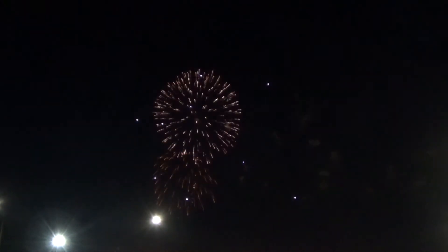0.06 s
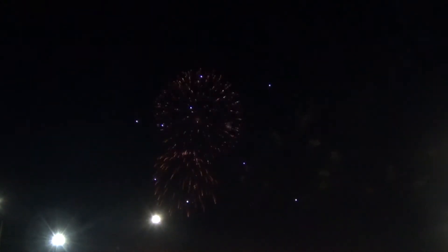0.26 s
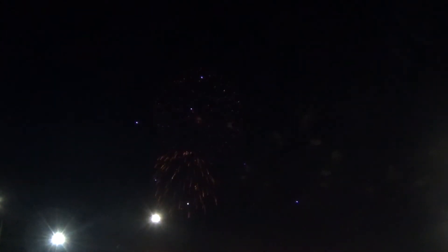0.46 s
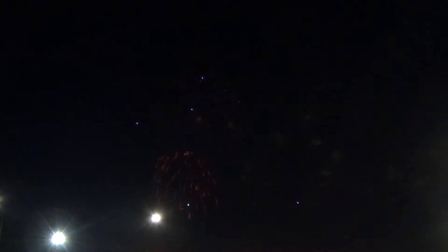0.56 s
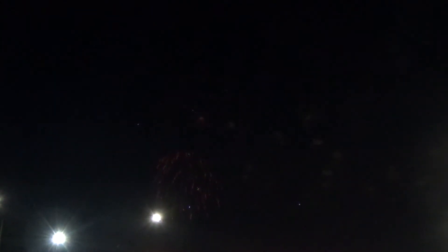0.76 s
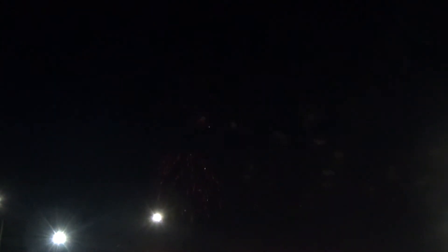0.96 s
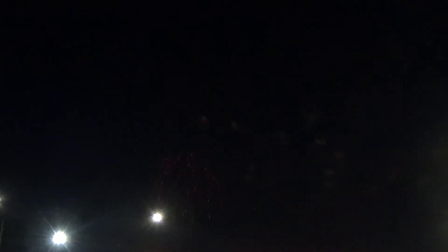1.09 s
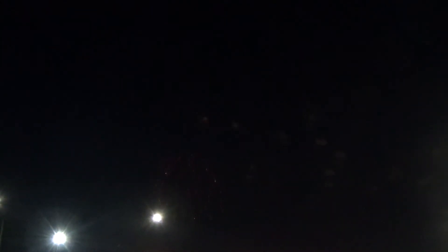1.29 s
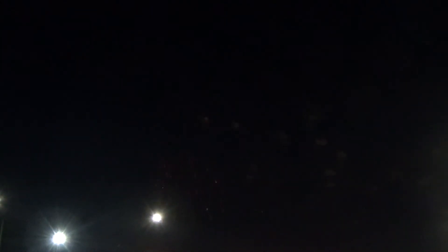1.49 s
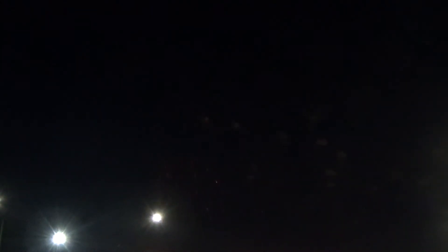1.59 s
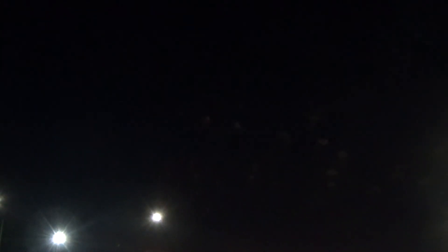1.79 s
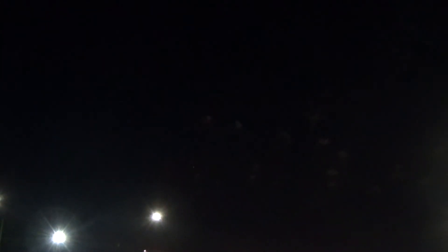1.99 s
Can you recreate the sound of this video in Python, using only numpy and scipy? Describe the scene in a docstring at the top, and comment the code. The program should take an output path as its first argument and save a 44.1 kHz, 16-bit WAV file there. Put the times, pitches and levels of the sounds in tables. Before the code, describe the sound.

A firework shell explodes at about 0.23 seconds after faint low night hum: a sharp, punchy crack with deep thuds, dense slapback and wide rumble rolling away over open land. A faint, dull burst sits inside the tail near 0.6. A smaller muffled bang comes at 1.45 with weak echoes. From about 1.8 to the end, very faint far crackle and tiny high insect chirps emerge.

```python
"""Firework shells burst far overhead at night: one big bang, a faint one inside its echoes, a smaller dull one later.
Each blast is a push of pressure with a sharp crack. Delayed copies come back off the ground and near walls,
short swings of bass return as thuds, and dying noise rolls away over the open land as rumble.
Shaped noise makes the rest: the far night underneath, a faint crackle, and an insect that starts to chirp."""
import sys
import numpy as np
from scipy import signal
from scipy.fft import rfft, irfft, next_fast_len
from scipy.io import wavfile
from scipy.ndimage import uniform_filter1d

SR = 44100
rng = np.random.default_rng(int(sys.argv[2]) if len(sys.argv) > 2 else 0)


def dump_mix(stems):
    """Bounce the given channels to the path in sys.argv[1] as a 16-bit WAV at rate SR."""
    frames = np.atleast_2d(stems).T  # one column per channel
    limited = np.clip(frames, -1, 1)  # hard clip at full scale
    pcm = np.round(limited * 32767).astype(np.int16)
    wavfile.write(sys.argv[1], SR, pcm)


N = 90404  # length of the scene in samples

# Spectra below give only the tone: the noise made from them is scaled to an rms of 1.
# Far night noise: (frequency [Hz], level per Hz [dB])
NIGHT_SPECTRUM = [(15, -50), (25, -19), (59, -2.5), (106, -7.5), (154, -3), (224, -7), (655, -17.5),
                  (1310, -25), (3090, -38), (3830, -44.5), (15000, -55)]
# Loudness of the night noise: (time [s], level [dB])
NIGHT_LEVEL = [(0, -44.5), (.04, -47.5), (.09, -48.5), (.14, -48), (.2, -46), (1.6, -44.5), (2.05, -42.5)]
# How alike the night is on the left and right: (frequency [Hz], likeness [0 to 1])
NIGHT_ALIKE = [(60, 1), (400, 1), (950, 0.93), (2400, 0.63), (6000, 0.51), (9000, 1), (12000, .99)]

# The shells. Air tone: below zero dulls the treble, above zero brightens it.
# (time [s], blast level [dB], push length [ms], crack over push [dB], echo level [dB],
#  air tone at 5 kHz [dB], bass of echoes [dB], thud level [dB], treble of echoes [dB])
SHELL_BURSTS = [(0.2293, -2, 1.24, -9, -16, 1.77, -1.5, -8.5, 1),
                (.6058, -20.5, 1.16, -8, -38.5, -9, 2.5, -43, -1),
                (1.4509, -15.5, 1.09, -5, -29.5, -11.5, -10, -50, -10)]
# The suction after the push: depth and length over those of the push; how late its deepest point comes
SUCTION_DEPTH, SUCTION_LENGTH, SUCTION_LATE = 0.64, 2.09, 1.2
# The shock front rings the microphone: width of its dip [s], then a high and a lower ring
CRACK_WIDTH_S = 0.00009
HIGH_RING_HZ, HIGH_RING_T60_S, HIGH_RING_DB = 8800, 0.003, -7
LOW_RING_HZ, LOW_RING_T60_S, LOW_RING_DB = 4330, 0.0018, -6
BLUNT_HZ = 12000  # above this the front is blunt
DETOUR_DB_PER_S = -120  # further air loss at 5 kHz for each second of detour

# Single reflections off the ground, walls and far fronts:
# (delay [ms], push level [dB], crack level [dB], push left over right [dB])
REFLECTIONS = [(3.67, -14, -32, 6), (7.06, -11.5, -44, 9), (8.4, -8.5, -19, -4), (10.537, -3.5, -37, 1),
               (12.92, -15.5, -43, -9), (19.94, -6.5, -36, 0), (48.9, -26.5, -20, 3),
               (96.8, -17.5, -39, 1.5), (119, -20.5, -17, -1.5), (212, -23, -30, -4), (293, -22, -21, 1.5),
               (512, -33.5, -24, 1)]
# Far reflectors that return the bass, against the burst's thud level: (delay [s], level [dB], pitch [Hz])
THUD_REFLECTORS = [(.012, -7.5, 85), (0.033, -10, 88.5), (0.062, -21, 140), (.098, -8.5, 173),
                   (.15, -15, 140), (0.18, -20, 130), (0.228, -15.5, 94), (0.262, -22.5, 85),
                   (0.329, -16.5, 97), (.40, -13, 78), (0.432, -18, 122), (0.854, -18, 148)]
THUD_CYCLES = 3.5  # swings of bass within one thud
THUD_LAG_S = 0.0013  # how late the right side hears them

# Echoes of the close surroundings: (frequency [Hz], level per Hz [dB])
CLOSE_SPECTRUM = [(18, -22), (30, -54), (89, 2.5), (384, -3), (698, -18.5), (774, -9), (978, -27),
                  (1600, -23), (3680, -32.5), (8920, -40), (15000, -80)]
# Time they take to fall by 60 dB: (frequency [Hz], time [s])
CLOSE_T60 = [(50, .6), (300, 0.37), (1500, 0.69), (5000, 0.43), (14000, 0.14)]
# Rolling echoes of the open land: (frequency [Hz], level per Hz [dB])
ROLL_SPECTRUM = [(15, -38), (25, -9), (75, 2.5), (128, 2), (231, -12), (438, -16.5), (588, -16),
                 (856, -19.5), (2020, -26.5), (9020, -48.5), (15000, -72)]
# Time they take to fall by 60 dB: (frequency [Hz], time [s])
ROLL_T60 = [(40, 2.9), (150, 2.65), (600, 3.02), (2500, 2.7), (7000, 2), (14000, 0.59)]
# First dense scatter off things close by: (frequency [Hz], level per Hz [dB])
SCATTER_SPECTRUM = [(150, -33), (350, 7), (700, 4), (1100, -7), (2200, -6.5), (4500, -23), (9000, -23),
                    (15000, -53.5)]
# Time it takes to fall by 60 dB: (frequency [Hz], time [s])
SCATTER_T60 = [(400, 0.17), (3000, 0.17)]
ROLL_DB, SCATTER_DB = -8.5, -6  # both against the close echoes
# How strongly the land answers, on top of the dying away: (delay [s], level [dB])
LAND_ANSWER = [(0, 1), (.04, 2.5), (.08, 1), (.115, 2), (.135, -1.5), (.2, -0.5), (.3, 1), (.42, -2),
               (.47, -1), (.7, 0), (1.1, 4), (1.8, 8)]
RISE_S, BASS_RISE_S, BASS_HZ = 0.0015, 0.03, 585  # build-up of echoes, slower below the corner
RAGGED_DB = 1  # echoes arrive in uneven slaps a few ms long
# How alike the echoes are on the left and right: (frequency [Hz], likeness [0 to 1])
ECHO_ALIKE = [(60, 1), (150, 1), (380, 0.82), (950, 0.46), (2400, 0.76), (6000, 0.58), (9000, 0.88),
              (12000, .99)]
# Which side the echoes and thuds lean to: (frequency [Hz], left over right [dB])
ECHO_LEAN = [(60, 0.5), (240, 0), (600, 1.5), (1500, 2.5), (4000, 2.6), (9000, 0)]

# The insect's chirps: (start [s], length [s], level [dB])
CHIRPS = [(1.785, .02, -76), (1.836, .012, -69), (1.864, .008, -70), (1.911, .022, -65), (1.976, .03, -67),
          (2.042, .02, -65)]
# Tone of its wing: (frequency [Hz], level per Hz [dB])
WING_SPECTRUM = [(3500, -39), (5500, -17), (7500, -10.5), (10000, -9), (12000, -19), (15000, -23)]
CHIRP_RISE_S, CHIRP_T60_S = 0.0019, 0.05
RASP_DB = 3  # unevenness of the wing's teeth

# Puffs of faint far crackle: (centre [s], spread [s], level [dB])
CRACKLE_PUFFS = [(1.796, 0.0052, -53), (1.992, 0.014, -58), (2.03, 0.032, -58)]
# Tone of the crackle: (frequency [Hz], level per Hz [dB])
CRACKLE_SPECTRUM = [(500, -28), (1100, -3), (1900, 16.5), (3600, -9), (5500, -33), (15000, -60)]

# The input: level where peaks round off, how sharply they do so, highest frequency kept
CLIP_TOP, CLIP_HARD, TOP_HZ = 0.66, 5, 15100


def amp(db):
    """Turn decibels into a plain multiplier."""
    return 10 ** (np.asarray(db) / 20)


def unit(x):
    """Scale x to an rms of 1."""
    return x / np.sqrt(np.mean(x ** 2) + 1e-20)


def along(points, hz):
    """Read a value between (Hz, value) points, on a log frequency axis."""
    f, v = np.transpose(points)
    return np.interp(np.log(hz + 1), np.log(f + 1), v)


def filtered(x, response):
    """Change the strength and timing of each frequency in x by a response."""
    m = next_fast_len(N + 8192)
    spectrum = rfft(x, m) * response(np.fft.rfftfreq(m, 1 / SR))
    return irfft(spectrum, m)[..., :N]


def rush(spectrum, alike):
    """Stereo noise of rms 1: a shared middle plus a side part that makes left and right differ."""
    def mid_side(hz):
        turn = np.arccos(np.clip(along(alike, hz), -1, 1)) / 2
        return amp(along(spectrum, hz)) * [np.cos(turn), np.sin(turn)]

    mid, side = filtered(rng.standard_normal((2, N)), mid_side)
    return unit(np.array([mid + side, mid - side]))


def night():
    """Far hum of the land, with the last of earlier echoes: noise that slowly changes level."""
    s, db = np.transpose(NIGHT_LEVEL)
    level_db = np.interp(np.arange(N) / SR, s, db)
    return amp(level_db) * rush(NIGHT_SPECTRUM, NIGHT_ALIKE)


def push(t, length):
    """The blast squeezes the air in a hump of pressure, then a longer suction follows."""
    u = t / length
    back = (u - 1) / SUCTION_LENGTH
    hump = np.sin(np.pi * u) * (u > 0) * (u < 1)
    suction = np.sin(np.pi * np.abs(back) ** SUCTION_LATE) * (back > 0) * (back < 1)
    return hump - SUCTION_DEPTH * suction


def crack(t):
    """The sharp shock front: a dip and two short rings."""
    def ring(hz, db, t60):
        return np.sin(2 * np.pi * hz * t) * amp(db - 60 * np.abs(t) / t60) * (t > 0)

    dip = np.exp(-((t + CRACK_WIDTH_S / 2) / CRACK_WIDTH_S) ** 2)
    high_ring = ring(HIGH_RING_HZ, HIGH_RING_DB, HIGH_RING_T60_S)
    low_ring = ring(LOW_RING_HZ, LOW_RING_DB, LOW_RING_T60_S)
    return high_ring + low_ring - dip


def air(hz, tone_db):
    """Air acts on treble far more than on bass: the dB grow with frequency squared."""
    return amp(tone_db * (hz / 5000) ** 2)


def late(hz, ms):
    """A path that arrives late, loses treble on its detour and has a blunt front."""
    delay = np.exp(-2j * np.pi * hz * ms / 1000)
    return delay * air(hz, DETOUR_DB_PER_S * ms / 1000) / (1 + (hz / BLUNT_HZ) ** 6)


def blast(t, push_ms, crack_db):
    """Push and crack heard straight from the shell and again by each single reflection."""
    paths = [(0.024, 0.014, 0, 0)] + REFLECTIONS  # the straight path comes first

    def push_paths(hz):
        return sum(late(hz, ms) * amp(level + np.array([[lean / 2], [-lean / 2]]))
                   for ms, level, _, lean in paths)

    def crack_paths(hz):
        return sum(late(hz, ms) * amp(crack_db + level) for ms, _, level, _ in paths)

    return filtered(push(t, push_ms / 1000), push_paths) + filtered(crack(t), crack_paths)


def dying(x, t60, start):
    """x from start on, each frequency dying at its own speed; the bass builds up more slowly."""
    hz, t, z = signal.stft(x, SR, nperseg=512)
    fall_db = -60 * np.maximum(t - start, 0) / along(t60, hz)[:, None]
    answer_db = np.interp(t - start, *np.transpose(LAND_ANSWER))
    x = signal.istft(z * amp(fall_db + answer_db), SR, nperseg=512)[1][:, :N]
    bass = filtered(x, lambda f: 1 / (1 + (f / BASS_HZ) ** 4))
    age = np.maximum(np.arange(N) / SR - start, 0)
    rise = 1 - np.exp(-age / RISE_S)
    bass_rise = 1 - np.exp(-(age / BASS_RISE_S) ** 2)
    return (x - bass) * rise + bass * bass_rise


def echoes(start):
    """Close echoes, rolling land and first scatter: dying noise in uneven slaps."""
    close = dying(rush(CLOSE_SPECTRUM, ECHO_ALIKE), CLOSE_T60, start)
    roll = dying(rush(ROLL_SPECTRUM, ECHO_ALIKE), ROLL_T60, start)
    scatter = dying(rush(SCATTER_SPECTRUM, ECHO_ALIKE), SCATTER_T60, start)
    # averaging twice over 200 samples leaves slow, random ups and downs
    wander = uniform_filter1d(uniform_filter1d(rng.standard_normal(N), size=200), size=200)
    slaps = unit(amp(RAGGED_DB * unit(wander)))
    return (close + amp(ROLL_DB) * roll + amp(SCATTER_DB) * scatter) * slaps


def thuds(t):
    """Far reflectors, each returning a short swing of bass, heard first on the left."""
    t = t + np.array([[THUD_LAG_S / 2], [-THUD_LAG_S / 2]])
    total = 0
    for s, db, hz in THUD_REFLECTORS:
        swing = np.cos(2 * np.pi * hz * (t - s))
        swell = np.exp(-((t - s) * hz / THUD_CYCLES * 2) ** 2)
        total = total + amp(db) * swing * swell
    return total * np.clip(t / RISE_S, 0, 1)


def burst(start, db, push_ms, crack_db, echo_db, air_db, bass_db, thud_db, treble_db):
    """One shell: the blast with its reflections, then thuds and echoes, all toned by the air."""
    t = np.arange(N) / SR - start

    def echo_tone(hz):
        bass = bass_db / (1 + (hz / 190) ** 4)
        treble = treble_db / (1 + (2500 / (hz + 1)) ** 2)
        lean = along(ECHO_LEAN, hz) / 2 * [[1], [-1]]
        return amp(bass + treble + lean)

    far = filtered(amp(echo_db) * echoes(start) + amp(thud_db) * thuds(t), echo_tone)
    near = amp(db) * blast(t, push_ms, crack_db)
    return filtered(near + far, lambda hz: air(hz, air_db))


def insect():
    """A toothed wing gives short grainy rasps: bright noise of uneven strength."""
    t = np.arange(N) / SR
    shape = 0
    for s, length, db in CHIRPS:
        fall_db = -60 * np.maximum(t - s - length, 0) / CHIRP_T60_S
        shape = shape + amp(db + fall_db) * np.clip((t - s) / CHIRP_RISE_S, 0, 1)
    teeth = unit(amp(RASP_DB * unit(uniform_filter1d(rng.standard_normal(N), size=40))))
    return shape * teeth * rush(WING_SPECTRUM, [(8000, 0.86)])


def crackle():
    """Short puffs of mid noise from far away, each swelling and fading smoothly."""
    t = np.arange(N) / SR
    shape = sum(amp(db) * np.exp(-((t - s) / spread) ** 2) for s, spread, db in CRACKLE_PUFFS)
    return shape * rush(CRACKLE_SPECTRUM, [(2000, 0.96)])


def scene():
    """The night, the shell bursts, the insect and the crackle added together."""
    return night() + sum(burst(*row) for row in SHELL_BURSTS) + insect() + crackle()


def record(dry):
    """The input rounds off the highest peaks; nothing is kept above the band limit."""
    soft = dry / (1 + np.abs(dry / CLIP_TOP) ** CLIP_HARD) ** (1 / CLIP_HARD)
    return filtered(soft, lambda hz: hz < TOP_HZ)


dry = scene()
out = record(dry)
dump_mix(out)
```